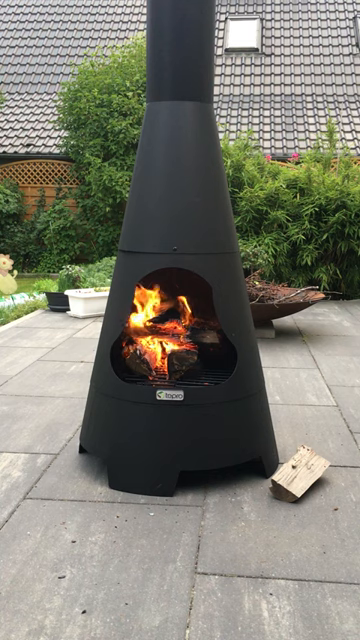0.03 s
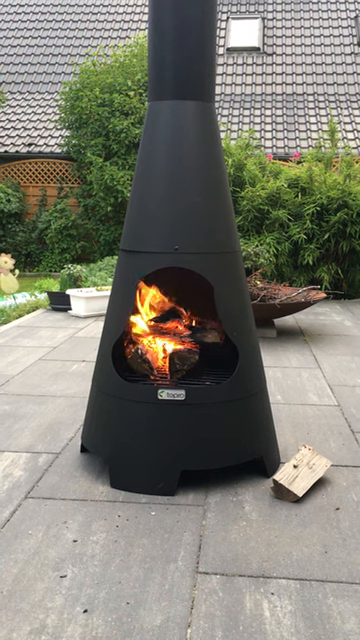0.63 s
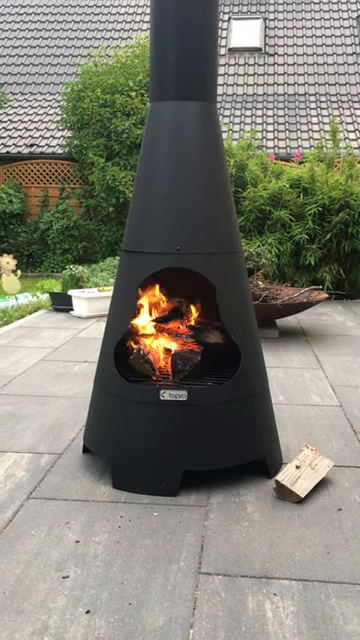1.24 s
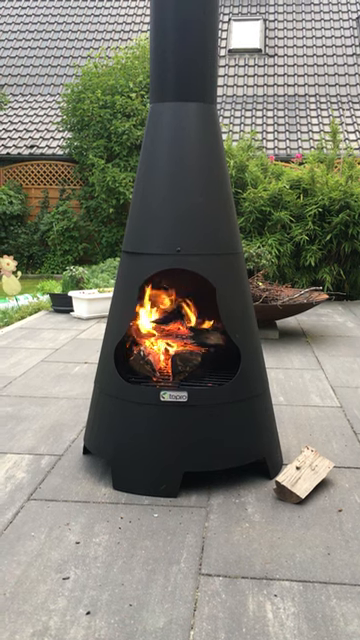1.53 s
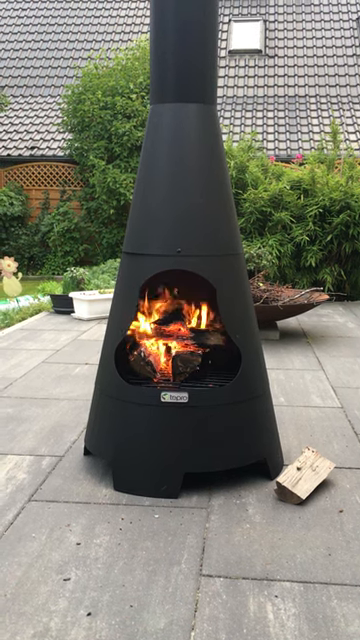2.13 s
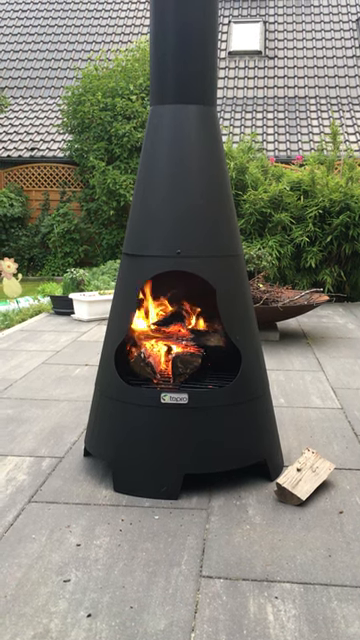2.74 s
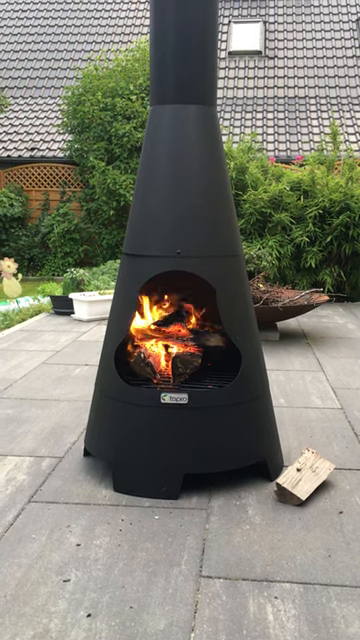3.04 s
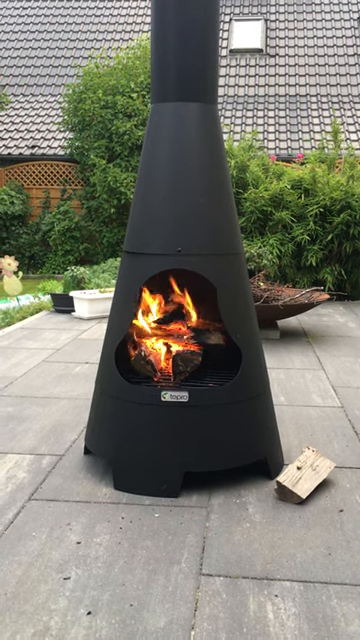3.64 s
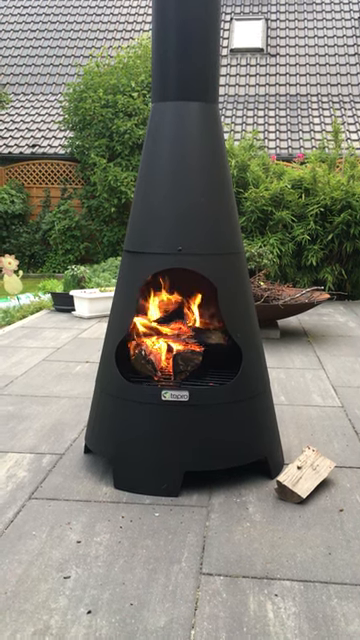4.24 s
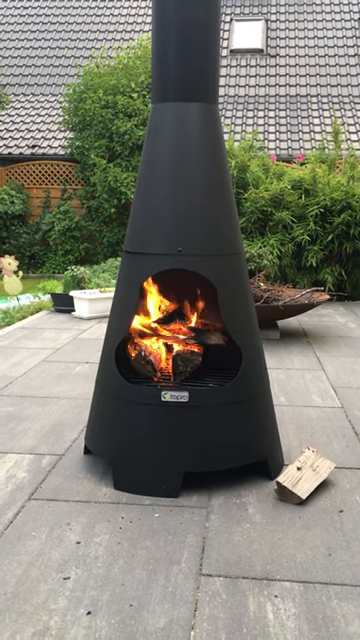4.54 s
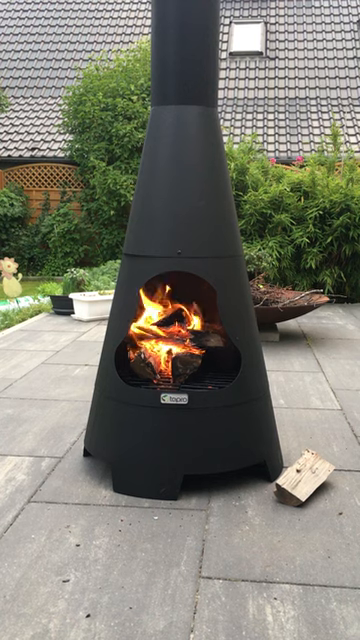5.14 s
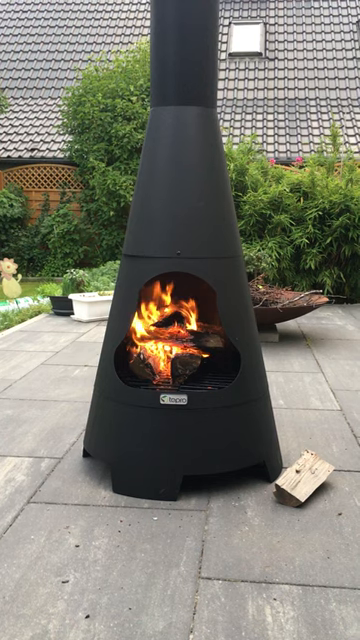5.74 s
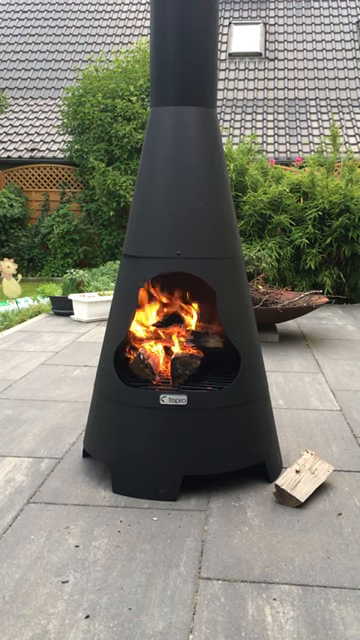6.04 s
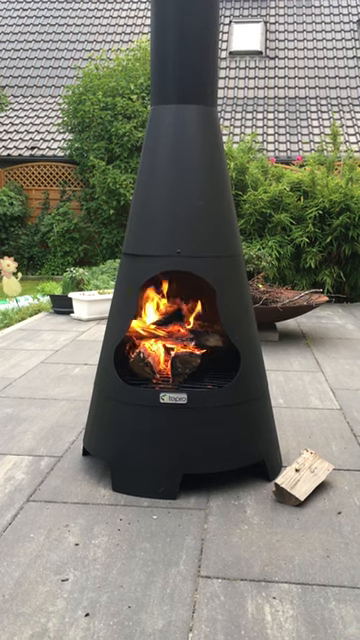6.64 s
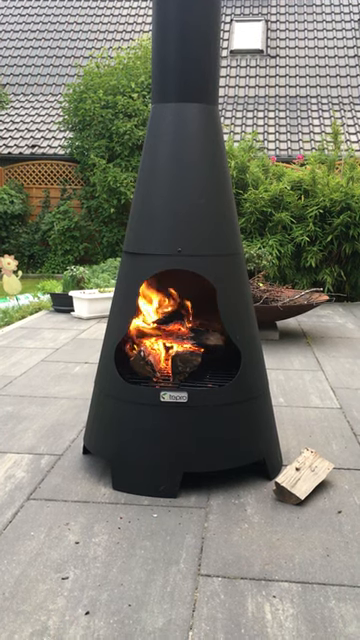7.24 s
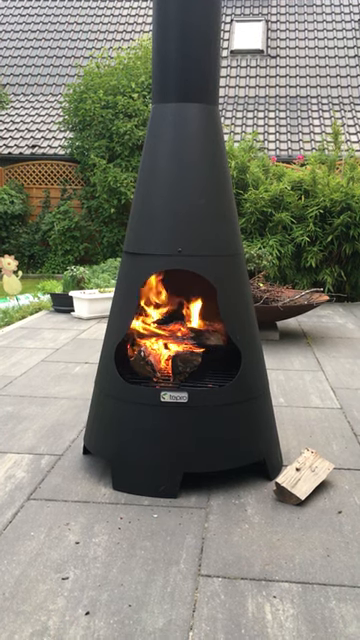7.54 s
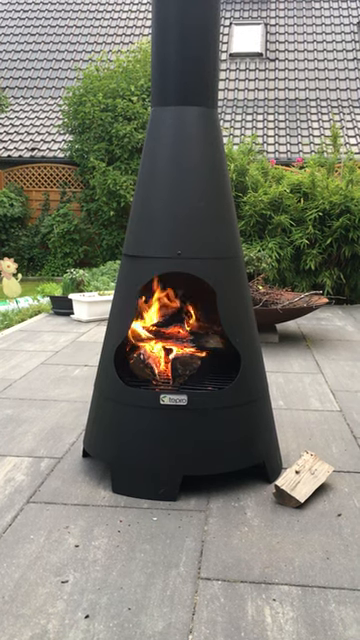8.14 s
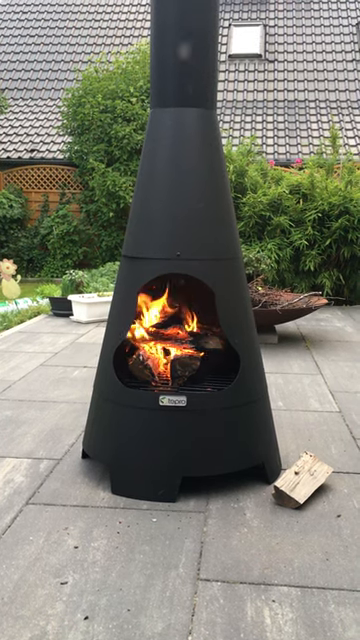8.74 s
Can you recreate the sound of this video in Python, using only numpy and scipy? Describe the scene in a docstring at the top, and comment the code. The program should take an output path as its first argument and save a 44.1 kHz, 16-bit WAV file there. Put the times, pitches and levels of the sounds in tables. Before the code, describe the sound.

Logs burn in a tall steel stove on a garden patio, giving sharp, irregular cracks and tiny ticks over a low flue rumble and soft hiss. Two much louder pops come about a third of the way in, then lighter crackling continues. The cracks sound close, with a brief metallic ring and a slight outdoor echo. Far birds whistle faintly now and then.

```python
"""Logs burn in a tall steel stove on a patio. From the first moment, over a soft hiss and a brief rustle,
the flames rumble in the flue and the wood cracks and ticks; each crack rings in the firebox and returns
from the house. Far birds begin to whistle and a log sizzles. Then come the two loudest pops, after which
the noise suppressor, which holds the hiss down, lets go for a moment. Later a second bird sings a
falling motif three times, a log sizzles again, and two last whistles sound far off."""
import sys
import numpy as np
from scipy import signal
from scipy.fft import rfft, irfft, next_fast_len
from scipy.io import wavfile
from scipy.ndimage import uniform_filter1d, map_coordinates

SR = 44100
rng = np.random.default_rng(int(sys.argv[2]) if len(sys.argv) > 2 else 0)


def generate_wav(signal):
    """Clip the signal to [-1, 1] and save it as 16-bit WAV at the path in sys.argv[1]."""
    frames = np.transpose(np.atleast_2d(signal))
    scaled = np.clip(frames, -1, 1) * 32767
    pcm = np.round(scaled).astype(np.int16)
    wavfile.write(sys.argv[1], SR, pcm)


N = 392490

# snaps of splitting wood: start_s, level_db, pitch_hz, quality_factor, ring_over_direct_db
WOOD_CRACKS = [(0.4957, -31, 6800, 4, 8), (.7371, -33, 4700, 2.9, 14), (.818, -31.5, 1000, 0.27, 4),
               (.9622, -38, 5000, .4, 1), (1.0545, -33.5, 4800, 0.26, 1), (1.292, -14.5, 1720, 2.2, 20),
               (1.709, -36.5, 6500, 14, -3), (1.79, -16.5, 3700, 0.7, -0.5), (1.927, -31, 1000, 0.35, 3),
               (2.2186, -36.5, 8200, 1.1, 6), (2.2622, -29.5, 7860, 1.5, 2), (2.376, -33, 2100, 0.18, 1),
               (2.3954, -22, 1160, 1.07, 2), (2.525, -32, 2240, 1.5, 15), (2.549, 4, 2350, 0.27, -3.5),
               (2.6176, -19.5, 8200, 0.56, -2), (2.6716, -15.5, 13500, 0.81, -0.5),
               (3.2736, 5, 1980, 1.1, -1), (3.3077, -25.5, 8400, 0.87, -2), (3.456, -27.5, 3200, 0.32, 1),
               (3.608, -25, 8300, 1.5, -3.5), (4.1049, -37.5, 14230, 2.2, 0.5),
               (4.208, -24, 1920, 2.5, 0.5), (4.348, -35.5, 8230, 3.7, 0), (4.6501, -39, 11300, 1.95, 5),
               (5.34, -28.5, 5380, 1.37, 20), (5.6548, -28.5, 7050, 5.1, 3), (5.8603, -37.5, 11000, 3.1, 1),
               (5.9078, -21, 2060, 1.5, 2), (6.0687, -27, 12500, 1.8, 6), (6.233, -30, 12000, 1.3, -2),
               (6.595, -26, 2600, 0.15, 5), (6.7813, -38, 7250, .4, -3), (6.875, -38, 12520, 0.62, 13),
               (7.7124, -38, 14000, 1.6, 12), (7.81, -26, 4550, 1.46, 1.5), (7.932, -31, 9050, 1.2, 10.5),
               (7.9693, -36.5, 2900, .4, 2), (8.0278, -23, 1410, 0.97, 10), (8.064, -34, 5900, .4, 7),
               (8.1155, -33, 1000, 0.58, -7), (8.158, -33.5, 10760, 0.48, 13)]
# normal modes of the steel firebox: frequency_hz, level_db, t60_s
FIREBOX_MODES = [(285, -20.5, 0.23), (420, -20.5, .14), (680, -15.5, 0.12), (943, -7.5, 0.045),
                 (1072, -1.5, .11), (1295, -1.5, .055), (1645, -21, .08), (1970, -8.5, 0.029),
                 (2440, -7.5, .08), (2590, -4, .08), (3180, -7.5, 0.062), (3310, -6.5, 0.053)]
# transmission through the stove mouth: frequency_hz, gain_db
MOUTH_RESPONSE = [(100, -5), (300, -7), (480, -13), (760, -14), (900, 0.5), (1300, 1), (1550, -6.5),
                  (2300, 2), (3500, 1), (5000, -1), (6800, 0.5), (9300, 1.5), (11000, -2), (16000, -5)]
# reverberation inside the stove: frequency_hz, t60_s
STOVE_DECAY = [(1000, 0.076), (2500, .055), (6000, .04), (14000, 0.039)]
# reverberation of the yard: frequency_hz, t60_s
YARD_DECAY = [(300, 0.4), (2000, 0.32), (7000, 0.16), (14000, 0.24)]
# dull blows inside the stove: start_s, level_db
LOG_KNOCKS = [(1.293, -22), (2.398, -32.5), (2.551, -28.5), (3.275, -22), (3.603, -42), (6.245, -28),
              (7.899, -36), (8.031, -33)]
# modes of the air column in stove and flue: frequency_hz, width_hz, gain_db
FLUE_MODES = [(56.4, 29, -5.5), (82, 26, -4), (112.5, 9.9, -3), (141, 18, 1.5), (152.8, 15, 2),
              (188.6, 29, -12.5), (296, 19, -19), (335, 25, -27.5)]
# roar due to the pull of the flue: time_s, level_db
DRAUGHT_LEVELS = [(.1, -51.5), (.8, -52), (1.5, -49.5), (3.8, -49), (4.7, -50), (5.1, -51.5), (6.4, -49),
                  (7.3, -51.5), (8.9, -50)]
# flames flaring with a soft whump: peak_s, level_db
FLAME_FLARES = [(0.441, -43.5), (.93, -43.5), (1.399, -45), (1.74, -45.5), (2.7, -45), (4.56, -42),
                (4.691, -42.5), (5.39, -46.5), (6.251, -39.5), (8.63, -44)]
# gas escaping from a log: start_s, length_s, level_db
GAS_JETS = [(2.14, 0.082, -67), (7.706, 0.113, -66)]
# glides of the first bird: start_s, length_s, start_hz, end_hz, level_db
BIRD_WHISTLES = [(1.696, .14, 2930, 3500, -68.5), (1.84, .18, 3030, 3424, -61.5),
                 (4.393, .36, 2670, 2646, -77), (6.22, 0.0566, 3260, 2870, -71),
                 (6.89, .17, 1940, 1920, -70), (6.95, 0.19, 2480, 2900, -74.5),
                 (8.43, .18, 2150, 2870, -74), (8.61, .12, 2850, 2560, -75)]
# repeats of the second bird's motif: start_s, level_db
MOTIF_REPEATS = [(5.606, -70), (5.952, -67.5), (6.287, -66.5)]
# notes of that motif: delay_s, length_s, start_hz, end_hz, gain_db
FALLING_NOTES = [(0, .09, 2554, 1934, 1), (0.056, 0.15, 3397, 2118, -0.5), (0.184, .12, 2750, 1880, 1)]
# chatter of the farthest birds: time_s, level_db
CHATTER_LEVELS = [(0, -94), (.7, -76), (1.55, -70), (1.9, -75.5), (4.5, -75.5), (5.8, -70.5), (6.2, -63.5),
                  (6.8, -73.5), (8.9, -75.5)]
# hiss of outdoor air and flames: frequency_hz, relative_density_db
HISS_SPECTRUM = [(20, -18), (200, -11.5), (400, 0), (500, -3), (750, -4.5), (1150, -3), (1550, -4),
                 (2400, -5.5), (3300, -8), (5000, -11), (7000, -10), (10400, -14.5), (12000, -14),
                 (16000, -19)]

MUTED_S = .083  # silence at the start


def crack(hz, q, ring_db, mouth, steel_db=-10, yard_db=-14.5, wall_db=-24, wall_delay_s=.034,
          tear_db=-3, tear_s=.00032):
    """Impulse response: a fracture sends out a spike, excites the firebox modes and echoes outdoors."""
    t = np.arange(SR // 4) / SR
    steel = sum(amp(db + rng.normal(0, 2) - 60 * t / t60) * np.sin(2 * np.pi * (f * t + rng.random()))
                for f, db, t60 in FIREBOX_MODES)
    path = amp(ring_db) * (tail(STOVE_DECAY, len(t)) + amp(steel_db) * unit_energy(steel))
    # the wood gives way at once, and its fibres go on tearing for a moment
    path[0] += 1
    path += amp(tear_db) * unit_energy(rng.standard_normal(len(t)) * t * np.exp(-t / tear_s))
    path += amp(yard_db) * tail(YARD_DECAY, len(t))
    add(path, wall_delay_s, amp(wall_db) * tail([(1000, .12)], len(t)))
    # the size of the splinter sets the pitch of the snap
    snap = filtered(path, lambda f: resonance(f, hz, hz / max(q, .2)))
    return unit_energy(signal.fftconvolve(snap, mouth)[:len(t)])


def crackle():
    """Radiation from an opening: the stove mouth colours every crack alike."""
    track, mouth = np.zeros(N), minimum_phase(MOUTH_RESPONSE)
    for start_s, db, hz, q, ring_db in WOOD_CRACKS:
        add(track, start_s, amp(db) * crack(hz, q, ring_db, mouth))
    return track


def embers(base_db=-47, spread_db=3, centre_hz=12000, q=5, ring_db=-3, count=140):
    """Power-law statistics: of the impulses that ring as faint high ticks, most are small."""
    track = np.zeros(N)
    for when, faintness, pitch in rng.random((count, 3)):
        hz = min(centre_hz * 2 ** (.29 * np.log(2 * pitch + .03)), SR / 3)
        path = amp(ring_db) * tail(STOVE_DECAY, SR // 50)
        path[0] += 1
        tick = signal.lfilter(*signal.iirpeak(hz, q, SR), path)
        level_db = base_db - spread_db * np.log(faintness + .062)
        add(track, when * N / SR, amp(level_db) * unit_energy(tick))
    return track


def knocks(pitch_hz=315, width_hz=160, t60_s=.16):
    """Damped resonance: low blows from the logs die away in the stove body."""
    track = np.zeros(N)
    for start_s, db in LOG_KNOCKS:
        thud = filtered(tail([(pitch_hz, t60_s)], SR // 4), lambda f: resonance(f, pitch_hz, width_hz))
        add(track, start_s, amp(db) * unit_energy(thud))
    return track


def flue_roar(flicker_db=.5, flicker_hz=14, flare_sigma_s=.011, low_hz=42, high_hz=380):
    """Forced vibration: draught and flares drive the air column; its mouth radiates no deep bass."""
    column = lambda f: sum((-1) ** k * amp(db) * resonance(f, hz, width)
                           for k, (hz, width, db) in enumerate(FLUE_MODES))
    band = lambda f: (f / low_hz) ** 3 / np.sqrt((1 + (f / low_hz) ** 6) * (1 + (f / high_hz) ** 6))
    t = np.arange(N) / SR
    flares = sum(amp(db) * np.exp(-.5 * ((t - s) / flare_sigma_s) ** 2) for s, db in FLAME_FLARES)
    draught = amp(curve(DRAUGHT_LEVELS) + flicker_db * wobble(flicker_hz))
    return np.hypot(draught, flares) * noise(lambda f: column(f) * band(f))


def sizzle(centre_hz=13000, width_hz=9000, spit_db=4, spit_hz=700, edge_s=.006):
    """Jet noise: gas sputters through a split in a log, which opens and closes quickly."""
    t = np.arange(N) / SR
    flow = sum(amp(db) * np.clip(np.minimum(t - start_s, start_s + length_s - t) / edge_s, 0, 1)
               for start_s, length_s, db in GAS_JETS)
    spits = rng.standard_normal(N) * amp(spit_db * wobble(spit_hz))
    return flow * unit(filtered(spits, lambda f: resonance(f, centre_hz, width_hz)))


def flame_flutter(level_db=-76, hollow_hz=1130, width_hz=330, depth_db=3, rate_hz=11):
    """Cavity resonance: licking flames stir the hollow of the firebox."""
    hollow = noise(lambda f: resonance(f, hollow_hz, width_hz))
    return amp(level_db + depth_db * wobble(rate_hz)) * hollow


def rustle(start_s=.111, level_db=-59, rise_s=.013, t60_s=.14, centre_hz=3200, width_hz=5000):
    """Exponential decay: a soft rush of noise rises quickly and dies away."""
    age = np.maximum(np.arange(N) / SR - start_s, 0)
    envelope = np.minimum(age / rise_s, 1) * amp(level_db - 60 * np.maximum(age - rise_s, 0) / t60_s)
    return envelope * noise(lambda f: resonance(f, centre_hz, width_hz))


def birdsong(notes, ease, echo_db, waver=.0084, echo_t60_s=.7):
    """Frequency modulation: each note swells, glides and fades, smeared by echoes between houses."""
    song, unsteady = np.zeros(N), 1 + waver * wobble(120)
    for start_s, length_s, start_hz, end_hz, db in notes:
        progress = np.linspace(0, 1, int(length_s * SR))
        glide = end_hz + (start_hz - end_hz) * (1 - progress) ** ease  # ease > 1 levels off
        pitch_hz = glide * unsteady[int(start_s * SR):][:len(glide)]
        envelope = amp(db) * np.sqrt(8 * progress * (1 - progress))
        note = envelope * np.sin(2 * np.pi * np.cumsum(pitch_hz) / SR)
        echo = signal.fftconvolve(note, tail([(2500, echo_t60_s)], SR // 2))
        add(song, start_s, note)
        add(song, start_s, amp(echo_db) * echo)
    return song


def birds():
    """Direct and reverberant sound: one far bird whistles, another's motif is mostly echo."""
    motifs = [(start_s + delay_s, length_s, start_hz, end_hz, db + note_db)
              for start_s, db in MOTIF_REPEATS
              for delay_s, length_s, start_hz, end_hz, note_db in FALLING_NOTES]
    return birdsong(BIRD_WHISTLES, ease=2.4, echo_db=-5.5) + birdsong(motifs, ease=1.4, echo_db=1.5)


def far_chorus(centre_hz=2300, spread=.14, width_hz=130, swell_db=6, swell_hz=11, count=9):
    """Incoherent addition: the farthest birds blur into narrow bands that come and go."""
    total = np.zeros(N)
    for hz in centre_hz * np.exp(spread * np.linspace(-1.5, 1.5, count)):
        blur = noise(lambda f: resonance(f, hz, width_hz) ** 2)
        total += blur * amp(swell_db * np.tanh(wobble(swell_hz)))
    return amp(curve(CHATTER_LEVELS)) * unit(total)


def air_hiss(level_db=-65):
    """Stationary noise: the outdoor air and the flames hiss softly."""
    return amp(level_db) * noise(lambda f: amp(along(HISS_SPECTRUM, f)))


def suppressor(x, knee_db=-64, depth_db=-9, edge_hz=600, detect_hz=9000, peak_db=-44, hold_s=.395):
    """Noise gating: quiet treble is turned down, except just after the start and each sharp peak."""
    treble = filtered(x, lambda f: f ** 2 / (f ** 2 + edge_hz ** 2))
    top = filtered(x, lambda f: f ** 8 / (f ** 8 + detect_hz ** 8))
    top_rms = np.sqrt(np.abs(uniform_filter1d(top ** 2, SR // 500)))
    t = np.arange(N) / SR
    last_trigger_s = np.maximum.accumulate(np.where(top_rms > amp(peak_db), t, MUTED_S / 2))
    resting = t - last_trigger_s < hold_s
    clicks = 1 / (1 + (amp(knee_db) / (top_rms + 1e-9)) ** 4)  # ticks above the knee pass too
    passed = np.maximum(uniform_filter1d(resting * 1., SR // 200), clicks)
    return x - treble * (1 - amp(depth_db)) * (1 - passed)


def amp(db):
    """Decibels as an amplitude ratio."""
    return 10 ** (np.asarray(db) / 20)


def unit(x):
    """Normalisation to rms 1."""
    return x / np.sqrt(np.mean(x ** 2) + 1e-20)


def unit_energy(x):
    """Normalisation to energy 1."""
    return x / (np.linalg.norm(x) + 1e-12)


def along(points, hz):
    """Interpolation of (frequency_hz, value) points on a log axis."""
    f, values = np.transpose(points)
    return np.interp(np.log(hz + 1), np.log(f), values)


def curve(rows):
    """Interpolation of (time_s, value) rows at every sample."""
    return np.interp(np.arange(N) / SR, *np.transpose(rows))


def wobble(rate_hz):
    """Random modulation: a smooth curve through rate_hz knots a second."""
    knots = rng.standard_normal(int(N * rate_hz / SR) + 4)
    return map_coordinates(knots, [np.arange(N) * rate_hz / SR])


def filtered(x, response):
    """Linear filtering: the spectrum of x times a frequency response."""
    size = next_fast_len(len(x) + SR // 10)
    return irfft(rfft(x, size) * response(np.fft.rfftfreq(size, 1 / SR)), size)[:len(x)]


def noise(response):
    """Spectral shaping of white noise, at rms 1."""
    return unit(filtered(rng.standard_normal(N), response))


def resonance(f, hz, width):
    """Frequency response of a damped oscillator."""
    return 1j * f * width / (hz * hz - f * f + 1j * f * width)


def minimum_phase(points, size=2048):
    """Causal impulse response of (frequency_hz, gain_db) points, by cepstral folding."""
    cepstrum = irfft(np.log(amp(along(points, np.fft.rfftfreq(size, 1 / SR)))))
    cepstrum[1:size // 2] *= 2
    cepstrum[size // 2 + 1:] = 0
    return irfft(np.exp(rfft(cepstrum)))


def tail(decays, length, size=128):
    """Reverberation: dense reflections of energy 1, each frequency dying at its own rate."""
    hz, t, spectra = signal.stft(rng.standard_normal(length), SR, nperseg=size)
    decay = amp(-60 * t / along(decays, hz)[:, None])
    return unit_energy(signal.istft(spectra * decay, SR, nperseg=size)[1][:length])


def add(track, start_s, sound):
    """Superposition of a sound on the track."""
    part = track[max(round(start_s * SR), 0):][:len(sound)]
    part += sound[:len(part)]


def scene():
    """Superposition in one channel: fire in front, garden behind."""
    fire = crackle() + embers() + knocks() + flue_roar() + sizzle()
    return (fire + air_hiss() + rustle() + birds() + far_chorus() + flame_flutter())[None]


def record(dry, top_hz=16100):
    """Gating and band limiting: the suppressor, a muted first instant and a steep low-pass."""
    fade_in = np.clip((np.arange(N) / SR - MUTED_S) * 200, 0, 1)
    gated = suppressor(dry[0]) * fade_in
    return filtered(gated, lambda f: 1 / np.sqrt(1 + (f / top_hz) ** 200))[None]


dry = scene()
out = record(dry)
generate_wav(out)
```